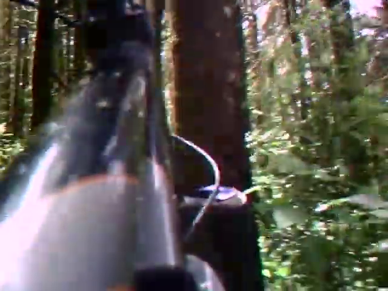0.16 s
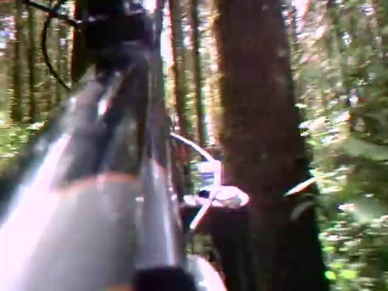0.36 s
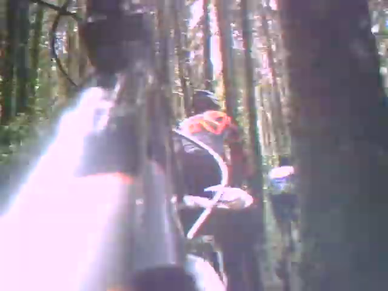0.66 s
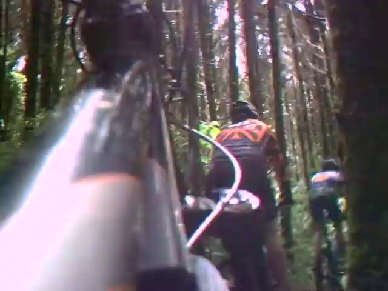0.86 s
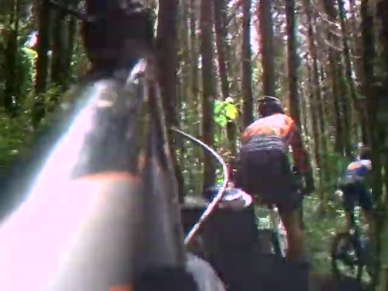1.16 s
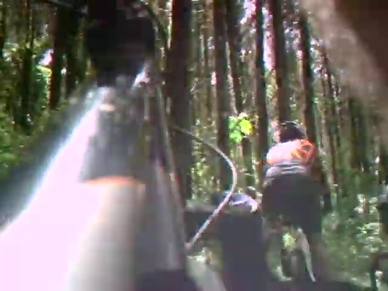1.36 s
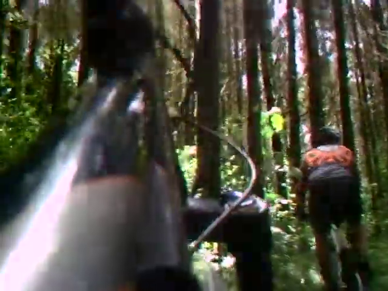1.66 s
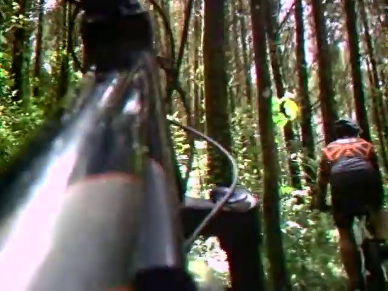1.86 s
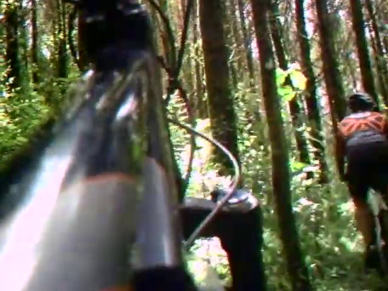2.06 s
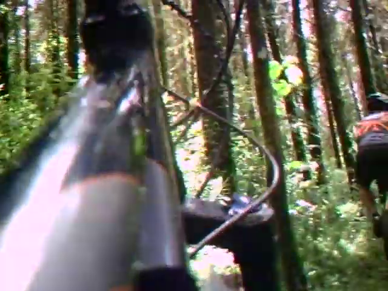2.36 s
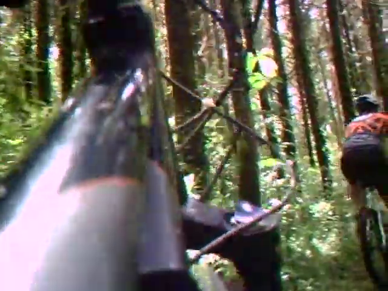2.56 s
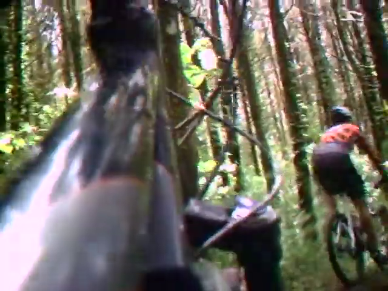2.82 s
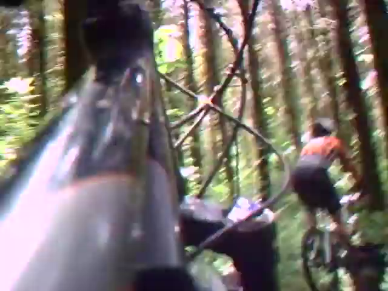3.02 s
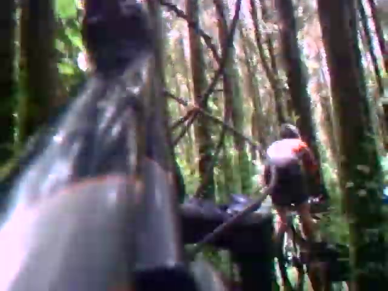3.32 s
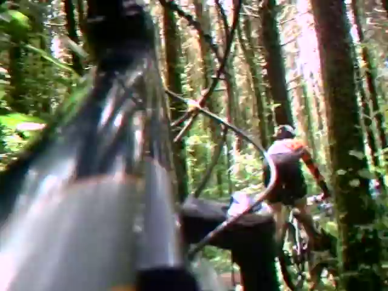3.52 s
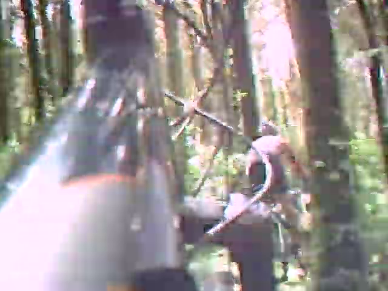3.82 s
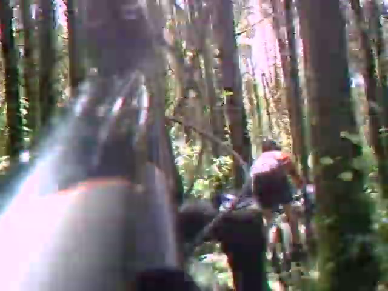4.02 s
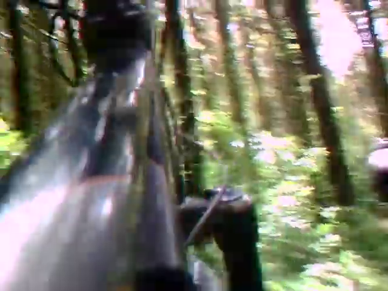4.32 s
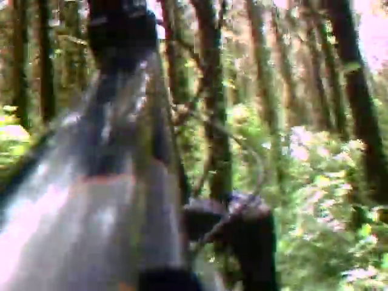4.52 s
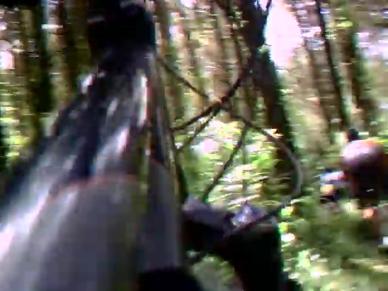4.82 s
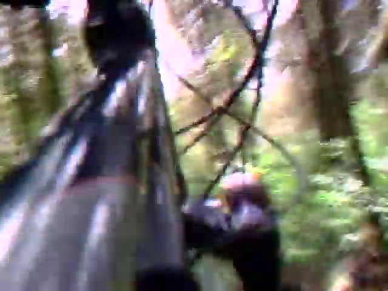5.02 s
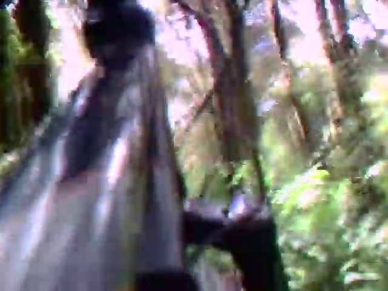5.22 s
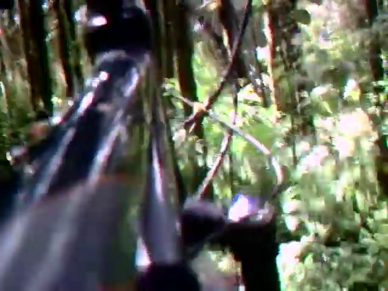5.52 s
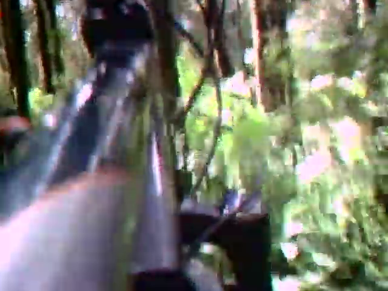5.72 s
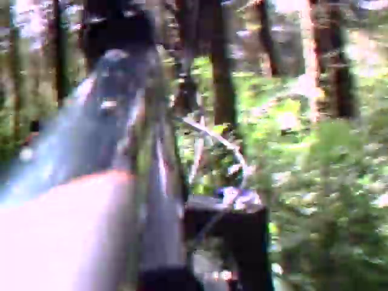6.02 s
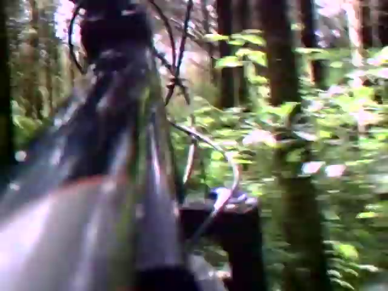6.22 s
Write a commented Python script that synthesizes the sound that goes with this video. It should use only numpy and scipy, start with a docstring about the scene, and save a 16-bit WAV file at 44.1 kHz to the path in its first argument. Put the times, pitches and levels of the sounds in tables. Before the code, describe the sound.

A mountain bike on a rough forest trail, heard by a small camera fixed to its frame. For the first 0.9 seconds there is mostly faint tyre hiss and low rumble, with a small rub and light cable ticks. Then knocks break out, with a hard hit near 1.15 and a fast chain flurry at 1.23 that leaves the spokes ringing low and briefly. More slapping bursts come around 1.6 to 1.75, 2.0 and 2.25. From 2.4 to 4.2 the knocks are more separate, with low thuds at 3.1 to 3.35 and short rubs or squeaks near 3.7 and 4.0. Clatter thickens at 4.3 to 4.5, then from about 5 seconds becomes dense, violent rattling until the end at 6.4, with a heavy thud near 5.97 and swelling rumble. Everything is close and dry, treble is dull, and loud blows crackle with clipping.

```python
"""Chain, cables and fittings knock on a mountain bike's frame, singly and in flurries: struck modes ring.
Below them: light cable ticks, rubs and squeaks, low thuds of the mount, and one long ring of the spokes.
Tyres on a rough forest trail hiss as coloured noise over a low rumble; both swell after each blow.
A small camera fixed to the frame hears it: its input clips loud peaks and its treble stops near 4 kHz."""
import sys
import numpy as np
from scipy import signal
from scipy.fft import rfft, irfft, next_fast_len
from scipy.io import wavfile

SR = 44100
rng = np.random.default_rng(int(sys.argv[2]) if len(sys.argv) > 2 else 0)


def unload_audio(sound):
    """Save the sound as a 16-bit wav file, at the path given as the first command line argument."""
    columns = np.transpose(np.atleast_2d(sound))
    # keep every value between -1 and 1, then stretch to whole-number steps
    steps = np.round(np.clip(columns, -1, 1) * 32767)
    wavfile.write(sys.argv[1], SR, steps.astype(np.int16))


N = 281358
TIME = np.arange(N) / SR


def amp(db):
    """Decibels to gain."""
    return 10 ** (np.asarray(db) / 20)


def unit(x):
    """Scales to an rms of one."""
    return x / np.sqrt(np.mean(x ** 2) + 1e-20)


def add(mix, start_s, sound):
    """Mixes a sound in at start_s."""
    part = mix[max(round(start_s * SR), 0):][:len(sound)]
    part += sound[:len(part)]


def colour(x, spectrum):
    """Filters by a spectrum of (frequency [Hz], gain [dB]) points, straight over log frequency."""
    hz, db = np.transpose(spectrum)
    size = next_fast_len(len(x) + 4096)
    f = np.fft.rfftfreq(size, 1 / SR)
    gain = amp(np.interp(np.log(f + 1), np.log(hz), db))
    return irfft(rfft(x, size) * gain, size)[:len(x)]


def drift(count, per_s):
    """Smooth random wander of about unit size, with per_s knots a second."""
    knots = rng.standard_normal(int(count / SR * per_s) + 2)
    return np.interp(np.arange(count) / SR * per_s, np.arange(len(knots)), knots)


def wavering_phase(count, hz, waver, per_s):
    """Phase [cycles] of a tone whose pitch wanders by the fraction waver."""
    return np.cumsum(hz * (1 + waver * drift(count, per_s))) / SR


def follow(curve):
    """The gain along a curve of (time [s], level [dB]) points."""
    return amp(np.interp(TIME, *np.transpose(curve)))


def decay(t, t60_s):
    """Exponential decay by 60 dB in t60_s."""
    return np.exp(-np.log(1000) * t / t60_s)


def ring(modes, contact, scatter_db=2.5, detune=0.02347, rise_s=0.000101):
    """A contact force rings modes weighted by the spot struck; unit rms over the first 5 ms."""
    hz, db, t60_s = np.transpose(modes)[:, :, None]
    t = np.arange(len(contact)) / SR
    weight, shift, phase = rng.standard_normal((3, len(modes), 1))
    tones = np.sin(2 * np.pi * (hz * (1 + detune * shift) * t + phase))
    notes = amp(db + scatter_db * weight) * decay(t, t60_s) * tones
    response = notes.sum(0) * (1 - np.exp(-t / rise_s))
    sound = signal.fftconvolve(response, contact)[:len(t)]
    return sound / np.sqrt(np.mean(sound[:220] ** 2))


def shake(hits, shake_s=.02):
    """Trembling of the bike: each blow adds power, which dies away with time constant shake_s."""
    keep = np.exp(-1 / (shake_s * SR))
    return np.sqrt(signal.lfilter([1 - keep], [1, -keep], hits ** 2) + 1e-12)


# wind and ground shake at the microphone, before trim: (time [s], level [dB])
BUFFET_CURVE = [(0, -59.5), (0.7, -51.5), (0.95, -35.5), (1.43, -46), (1.7, -31), (1.95, -42.5),
                (2.55, -49), (3.0, -41.5), (3.32, -23.5), (3.48, -44), (4.5, -39), (4.86, -42.5),
                (5.05, -31.5), (5.6, -32.5), (6.38, -19.5)]
# rumble colour: (frequency [Hz], relative level per Hz [dB])
RUMBLE_COLOUR = [(12, -34.5), (25, -20.5), (45, -8.5), (75, 2), (120, -0.5), (200, -6.5), (320, -7),
                 (600, -20), (1500, -72)]


def rumble(tremble, level_db=1.5, shaken_db=-33):
    """Wind and ground shake the microphone: low noise, stronger while the bike trembles."""
    level = np.hypot(amp(level_db) * follow(BUFFET_CURVE), amp(shaken_db) * tremble)
    return unit(colour(rng.standard_normal(N), RUMBLE_COLOUR)) * level


# work of the tyres on the ground, before trims: (time [s], level [dB])
TRAIL_CURVE = [(0, -33.5), (0.27, -31.5), (0.62, -36.5), (0.9, -27), (1.4, -31.5), (1.7, -25.5), (2.0, -27),
               (2.14, -30.5), (2.35, -25), (2.53, -32), (3.2, -27), (3.5, -30), (3.7, -28.5), (3.97, -31.5),
               (4.42, -27.5), (4.85, -32), (5.25, -24.5), (5.42, -27), (5.7, -20.5), (6.0, -25),
               (6.38, -29.5)]
# tyre roll colour: (frequency [Hz], relative level per Hz [dB])
ROLL_COLOUR = [(150, -17), (300, -11), (420, -5), (520, 1), (720, -2.5), (920, -0.5), (1040, -5.5),
               (1190, -0.5), (1450, -10), (2000, -34), (3000, -60)]
# grit colour: (frequency [Hz], relative level per Hz [dB])
GRIT_COLOUR = [(700, -32), (1400, -7.5), (1730, 0.5), (1940, -1.5), (2070, -1), (2270, -1), (2520, -5),
               (2800, -10.5), (3100, -10), (3600, -11.5), (4300, -14), (5000, -60.5)]


def tyres(tremble, roll_db=0.5, grit_db=-14.5, grit_follows=0.5638, shaken_roll_db=-20,
          shaken_grit_db=-27, grains_db=-3, grain_share=0.0078, grain_spread_db=3.5, lumps_db=2.5):
    """Knobbly tyres roll over lumpy soil, grit ticks finely; both swell while the bike trembles."""
    ground = follow(TRAIL_CURVE)
    lumps = amp(lumps_db * drift(N, 70))

    roll_level = np.hypot(amp(roll_db) * ground, amp(shaken_roll_db) * tremble)
    roll = unit(colour(rng.standard_normal(N), ROLL_COLOUR)) * roll_level

    sizes = amp(grain_spread_db * np.minimum(rng.exponential(1, N), 4)) * rng.choice([-1, 1], N)
    grains = unit(sizes * (rng.random(N) < grain_share))
    crunch = unit(colour(rng.standard_normal(N) + amp(grains_db) * grains, GRIT_COLOUR))
    grit_level = np.hypot(amp(grit_db) * ground ** grit_follows, amp(shaken_grit_db) * tremble)
    return lumps * (roll + crunch * grit_level)


# spoke notes: (frequency [Hz], level [dB], t60 [s])
SPOKE_MODES = [(342.4, -22.5, 0.78), (469, -19.5, 0.985), (661, -18.5, 0.62), (814, -36, .4),
               (860, -32.5, 0.49), (1147, -32, .45)]


def spokes(landing_s=1.235, waver=0.0109, flutter_db=2.5):
    """Spokes sing on after the first hard landing: decaying low notes, wavering in pitch and level."""
    out, t = np.zeros(N), np.arange(SR) / SR
    for hz, db, t60_s in SPOKE_MODES:
        tone = np.sin(2 * np.pi * wavering_phase(SR, hz, waver, 40))
        level = amp(db + flutter_db * drift(SR, 30))
        add(out, landing_s, level * decay(t, t60_s) * tone)
    return out


# thuds through the camera mount: (peak time [s], frequency [Hz], peak level [dB])
MOUNT_THUDS = [(3.094, 90, -14.5), (3.14, 159, -6), (3.213, 100, -18.5), (3.25, 139, -14),
               (3.272, 160, -11), (3.292, 202, -11), (3.328, 110, -19.5), (3.353, 138, -8.5),
               (5.942, 168.8, -8), (5.973, 158.4, 0.5), (6.002, 121.2, -8), (6.186, 179.3, -11.5),
               (6.305, 160.4, -10.5)]


def thuds(cycles=0.534, waver=0.337):
    """The mount is jolted out and swings back: a short, wavering cosine in a Gaussian envelope."""
    out, t = np.zeros(N), np.arange(-2000, 2000) / SR
    for peak_s, hz, db in MOUNT_THUDS:
        turns = wavering_phase(len(t), hz, waver, 238.7)
        swing = np.cos(2 * np.pi * (turns - turns[len(t) // 2]))
        add(out, peak_s + t[0], amp(db) * np.exp(-(t * hz / cycles) ** 2) * swing)
    return out


# rubs and squeaks of tyre and brake: (peak time [s], length [s], frequency [Hz], level [dB])
TYRE_BRAKE_RUBS = [(0.134, 0.0284, 590, -29), (0.884, 0.0313, 534, -21), (1.108, 0.039, 1767, -21.5),
                   (1.457, 0.023, 1279, -27.5), (1.496, 0.02, 533.6, -21.5), (2.957, 0.02, 510.6, -20),
                   (3.723, 0.0297, 519, -16), (4.014, 0.021, 1190, -22.5), (4.257, 0.0206, 1200, -17.5)]


def rubs(waver=0.0653, flutter_db=3, scrape=0.597):
    """Rubber or pad catches briefly: a wavering tone over scrape noise of the same pitch."""
    out, t = np.zeros(N), np.arange(-3000, 3000) / SR
    for peak_s, length_s, hz, db in TYRE_BRAKE_RUBS:
        tone = np.sqrt(2) * np.sin(2 * np.pi * wavering_phase(len(t), hz, waver, 597))
        band = [(hz / 4, -30), (hz / 2, -6), (hz, 0), (hz * 2, -6), (hz * 4, -30)]
        noise = unit(colour(rng.standard_normal(len(t)), band))
        level = amp(db + flutter_db * drift(len(t), 300)) * np.exp(-(2 * t / length_s) ** 2)
        add(out, peak_s + t[0], level * (tone + scrape * noise))
    return out


# modes of a small fitting: (frequency [Hz], level [dB], t60 [s])
FITTING_MODES = [(800, -10, 0.0087), (1828, -7.5, 0.02), (2343, -4, .009), (2832, -0.5, 0.00774),
                 (3768, 0, 0.00645), (4033, -1.5, 0.0047)]


def tick(scatter_db=2, chatter=0.48, chatter_s=0.00075):
    """A light, hard touch: an impulse and fast-dying contact noise ring a fitting."""
    t = np.arange(900) / SR
    contact = chatter * rng.standard_normal(len(t)) * np.exp(-t / chatter_s)
    contact[0] = 1
    return ring(FITTING_MODES, contact, scatter_db)


# clear cable flicks: (time [s], level [dB])
CABLE_TICKS = [(0.081, -23), (0.403, -25.5), (0.449, -21), (0.715, -11.5), (0.841, -11), (1.088, -15),
               (1.109, -13), (1.139, -10), (1.169, -14.5), (1.204, -13.5), (1.859, -13.5), (1.889, -11),
               (2.082, -10.5), (2.365, -10), (2.793, -16.5), (3.07, -15), (3.165, -20), (3.193, -18.5),
               (3.258, -10), (3.299, -9.5), (3.502, -14.5), (3.665, -15), (3.847, -17.5), (4.173, -15.5),
               (4.219, -11.5), (4.767, -20), (4.805, -14), (5.582, -12.5), (6.132, -14.5)]


def ticks(count=60, faint_db=-3, spread_db=2):
    """Cables flick fittings: listed clear ticks, and faint random ones that follow the ground level."""
    out, ground = np.zeros(N), follow(TRAIL_CURVE)
    for start_s, db in CABLE_TICKS:
        add(out, start_s, amp(db) * tick())
    for at, size in zip(rng.integers(0, N, count), rng.standard_normal(count)):
        add(out, at / SR, ground[at] * amp(faint_db + spread_db * size) * tick())
    return out


# low bending modes of the frame tubes: (frequency [Hz], level [dB], t60 [s])
TUBE_BENDING_MODES = [(491.6, -6.5, 0.0339), (564.3, -4, 0.0254), (691.8, 1.5, 0.0148), (799.7, 0, 0.01584),
                      (919.3, 0.5, 0.0166), (1209.8, -2.5, 0.01385), (1445, -8.5, 0.0149)]
# higher modes of the tube walls: (frequency [Hz], level [dB], t60 [s])
TUBE_WALL_MODES = [(1718.2, -1, 0.01676), (1905.5, -1.5, 0.0192), (2184.6, -6, 0.02324),
                   (2296.8, -3.5, 0.02173), (2770.6, -3.5, 0.01192), (3105.4, -4.5, 0.0079),
                   (3535.6, -2.5, 0.00547), (3907, -1, 0.00452)]


def blow(hardness_db, chatter=0.264, chatter_s=0.00505, chatter_per_s=900,
         rebound_db=-13, rebound_s=0.008012):
    """Soft parts bend the tubes, hard parts ring their walls; the part chatters and lands again, dully."""
    t = np.arange(1600) / SR
    touches = rng.standard_normal(len(t)) * (rng.random(len(t)) < chatter_per_s / SR)
    contact = chatter * touches * np.exp(-t / chatter_s)
    contact[0] = 1
    # wall to bending ratio = hardness, total power constant
    soft, hard = np.array([1, amp(hardness_db)]) / np.hypot(1, amp(hardness_db))
    sound = soft * ring(TUBE_BENDING_MODES, contact) + hard * ring(TUBE_WALL_MODES, contact)
    rebound = amp(rebound_db) * soft * ring(TUBE_BENDING_MODES[:3], contact)
    add(sound, rebound_s * (.5 + rng.random()), rebound)  # 0.5 to 1.5 times rebound_s
    return sound


# chain thrashing after bumps: (start [s], length [s], level before trim [dB], slap rate [1/s])
CHAIN_FLURRIES = [(0.908, 0.11, -9.5, 110), (1.228, 0.043, 2.5, 250), (1.271, 0.0442, -13.5, 130),
                  (1.601, 0.04236, -5, 170), (1.666, 0.05085, 0.5, 250), (1.742, 0.0543, -12.5, 90),
                  (1.955, 0.1035, -12.5, 113.5), (2.26, 0.0775, 2.5, 250), (4.318, 0.0603, -12, 100),
                  (4.394, 0.019, 1.5, 250), (4.999, .035, -10.5, 140), (5.101, 0.01783, -4.5, 170),
                  (5.115, 0.0338, -2.5, 250), (5.199, 0.0109, -6.5, 170), (5.21, 0.117, 1.5, 250),
                  (5.345, 0.032, -2.5, 250), (5.475, 0.01415, -3.5, 250), (5.522, .055, -15.5, 200),
                  (5.591, 0.0196, -1.5, 250), (5.612, 0.04863, -13.5, 120), (5.665, 0.07117, -1, 250),
                  (5.765, 0.03535, -0.5, 250), (5.831, 0.04326, -3.5, 250), (6.044, 0.02775, -1.5, 250),
                  (6.079, 0.0281, -0.5, 250), (6.249, .025, -15, 120), (6.318, .05, -11, 110)]


def flurries(spread_db=2.0, hardness_db=1, hardness_spread_db=5, level_db=-2, uneven=.25):
    """Link after link slaps the frame: blows of random size and hardness at uneven gaps of milliseconds."""
    out = np.zeros(N)
    for start_s, length_s, db, per_s in CHAIN_FLURRIES:
        count = int(np.clip(round(length_s * per_s), 2, 40))
        slot, size, hardness = rng.standard_normal((3, count))
        slot[0] = 0  # first slap on time
        times_s = start_s + length_s * (np.arange(count) + uneven * slot) / count
        gains = amp(db + level_db) * unit(amp(spread_db * size))
        for at_s, gain, hard in zip(times_s, gains, hardness):
            add(out, at_s, gain * blow(hardness_db + hardness_spread_db * hard))
    return out


# loose parts hitting the frame: (time [s], level [dB], hardness as wall over bending [dB], bounces [count])
# hardness: dull knock < 0 < sharp tick
FRAME_KNOCKS = [(0.426, -20, -5, 1), (0.893, -7, 1, 0), (0.923, -5, 6, 0), (0.931, -6.5, -5.5, 1),
                (0.966, -5.5, -4.5, 0), (0.979, -9.5, 14.5, 0), (0.986, -5.5, -4, 0), (1.002, -5, 16, 0),
                (1.039, -10, -1.5, 0), (1.057, -7.5, -4.5, 0), (1.148, 3, -3.5, 0), (1.228, -4, -9, 0),
                (1.284, -4.5, -1.5, 0), (1.568, -18.5, 9.5, 0), (1.576, -1.5, 10.5, 1), (1.6, -3.5, 1.5, 0),
                (1.655, -3.5, 4.5, 0), (1.734, -4.5, -6, 0), (1.748, -5, 13, 0), (1.779, -7.5, -3.5, 0),
                (1.819, -15, 7, 0), (1.833, -8, 4.5, 0), (1.88, -11.5, -9.5, 0), (2.009, -8.5, -16, 0),
                (2.023, 0.5, -4.5, 1), (2.062, -12.5, 3, 0), (2.094, -8.5, -1.5, 0), (2.175, -14, -7.5, 0),
                (2.194, -19.5, -11, 1), (2.235, -0.5, -1, 2), (2.432, -14.5, 0.5, 0), (2.651, -10, -6.5, 0),
                (2.748, -3.5, -5, 1), (2.901, -4.5, -2, 0), (2.982, -3.5, 2.5, 2), (3.029, -2, -5, 1),
                (3.148, -1, 6, 0), (3.273, -2.5, -3.5, 0), (3.379, -1.5, -2, 1), (3.42, -7, -0.5, 1),
                (3.468, -8, -8, 0), (3.486, -12.5, -24.5, 0), (3.538, -14.5, -2, 0), (3.594, -19, 12.5, 0),
                (3.627, -19.5, 5, 0), (3.804, -14.5, -1.5, 0), (3.856, -10.5, -8, 0), (3.905, -19.5, 16, 0),
                (4.111, -15.5, -6.5, 1), (4.238, -8.5, -1, 0), (4.338, -8, 3, 0), (4.347, -6, -2, 0),
                (4.376, -5, 2, 0), (4.422, -8.5, 2.5, 1), (4.446, -6.5, 0, 0), (4.479, -2.5, 0.5, 1),
                (4.513, -6, -2.5, 1), (4.533, -6.5, -2.5, 2), (4.587, -8.5, -9, 0), (4.675, -11.5, -7, 0),
                (4.691, -11.5, -6, 0), (4.897, -5, 0, 0), (4.958, -1.5, -1, 1), (4.985, -10, 0, 0),
                (4.996, 2, -1, 0), (5.035, -8, 0, 1), (5.069, -3, -1.5, 1), (5.09, 2.5, 0.5, 0),
                (5.188, -7, -2, 0), (5.455, -13.5, -10, 0), (5.539, -5.5, -3, 0), (5.619, -0.5, -1, 0),
                (5.639, -1.5, -3.5, 0), (5.749, -2, -3, 0), (5.813, 1.5, -0.5, 0), (5.904, -5, 1.5, 2),
                (5.948, 0, -2, 0), (5.963, -11.5, -2.5, 0), (5.995, -4, -4.5, 0), (6.02, -10, 4.5, 0),
                (6.119, -5, -2, 0), (6.218, 0, -0.5, 0), (6.232, -4.5, -2.5, 1), (6.263, -4, 5, 0),
                (6.299, -3.5, -1, 1), (6.33, -1, -0.5, 2), (6.373, -2.5, 1, 0)]


def knocks(bounce_s=.0102, bounce_db=-3, bounce_harder_db=5):
    """Chain, cables and fittings hit the frame; each bounce comes later, weaker and sharper."""
    out = np.zeros(N)
    for start_s, db, hardness_db, bounces in FRAME_KNOCKS:
        for k in range(round(bounces) + 1):
            sound = blow(hardness_db + k * bounce_harder_db)
            add(out, start_s + k * bounce_s, amp(db + k * bounce_db) * sound)
    return out


def scene():
    """Sums all sources, close and dry; the blows also drive the trembling."""
    hits = knocks() + flurries()
    tremble = shake(hits)
    small = spokes() + thuds() + rubs() + ticks()
    return (rumble(tremble) + tyres(tremble) + small + hits)[None]


# treble roll-off of the recorder: (frequency [Hz], gain [dB])
TREBLE_ROLL_OFF = [(3400, -1), (3700, -5.5), (4000, -15), (4300, -20.5), (4550, -31.5), (4800, -60.5),
                   (5200, -100)]


def record(dry, input_limit=0.6937, output_limit=.705, edge_hz=16000):
    """The input clips, treble is cut near 4 kHz, overshoots clip again into a faint fizz up to edge_hz."""
    narrow = colour(np.clip(dry[0], -input_limit, input_limit), TREBLE_ROLL_OFF)
    clipped = np.clip(narrow, -output_limit, output_limit)
    low_pass = signal.firwin(511, edge_hz, window=("kaiser", 9), fs=SR)
    return signal.oaconvolve(clipped, low_pass, "same")[None]


dry = scene()
out = record(dry)
unload_audio(out)
```